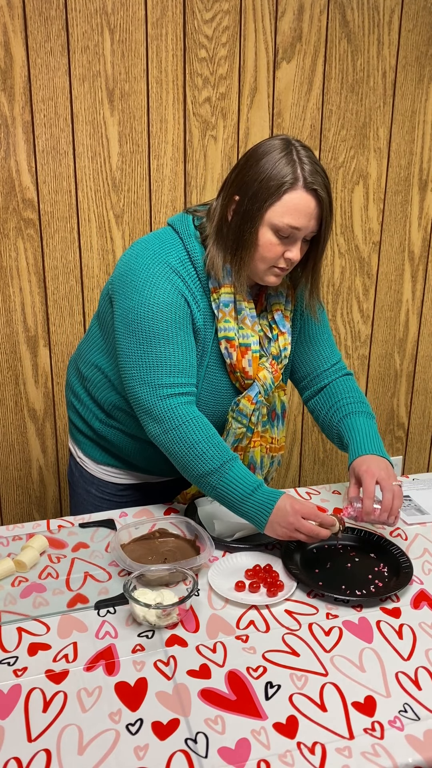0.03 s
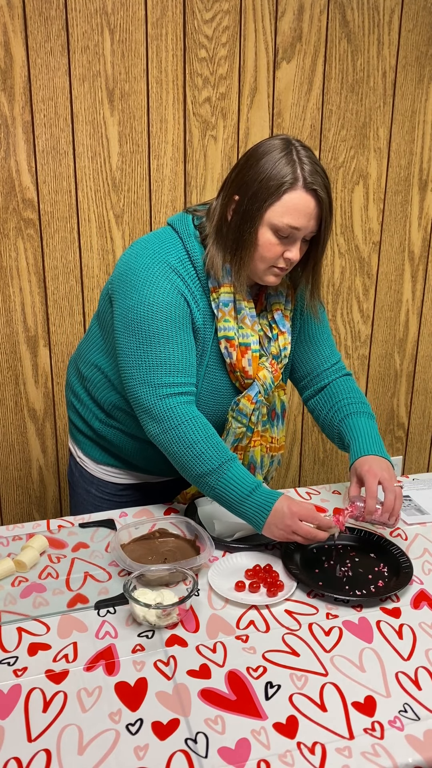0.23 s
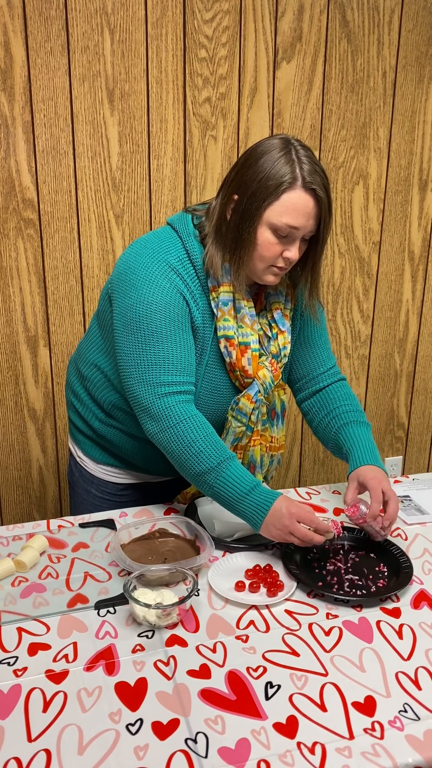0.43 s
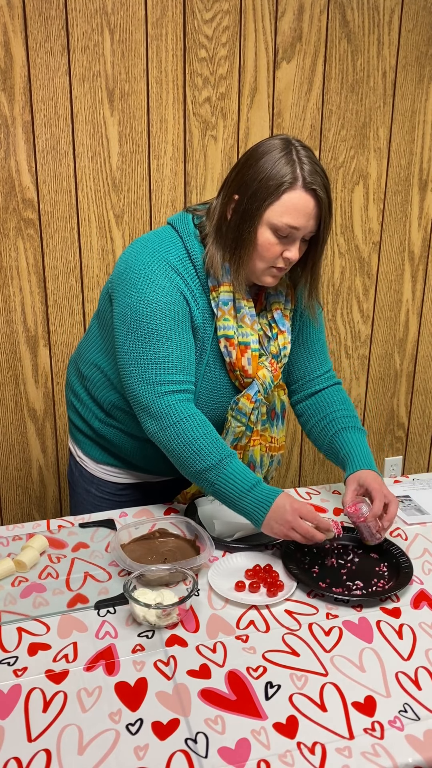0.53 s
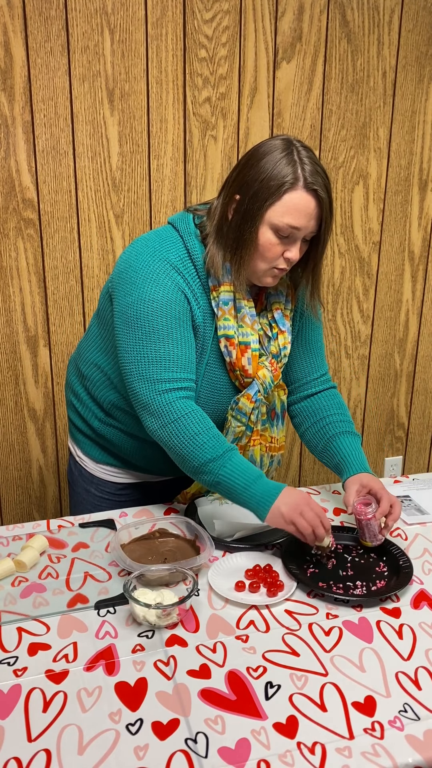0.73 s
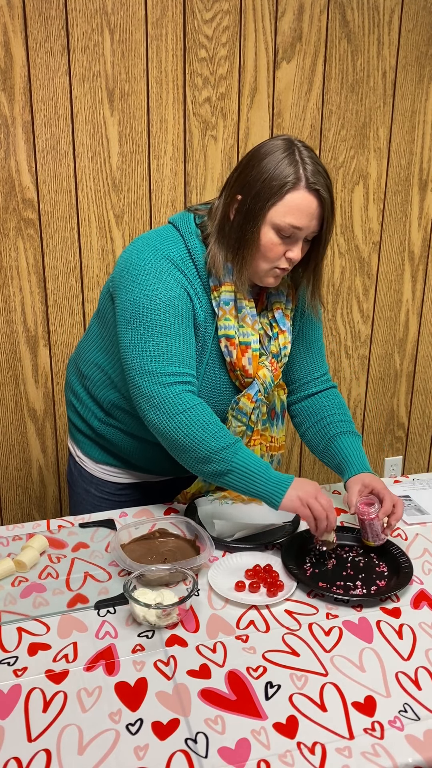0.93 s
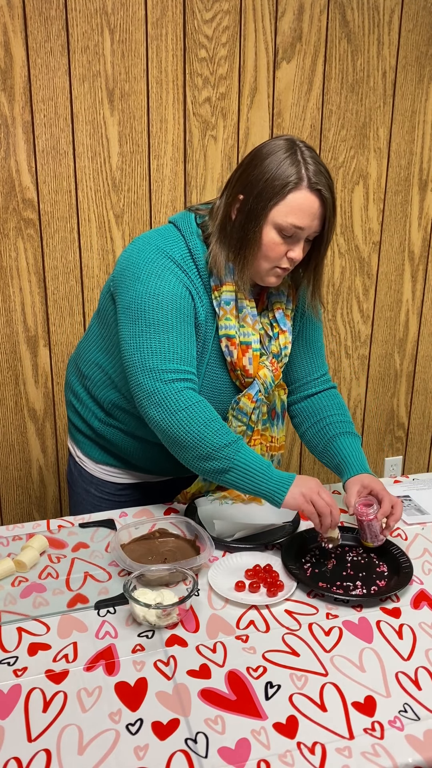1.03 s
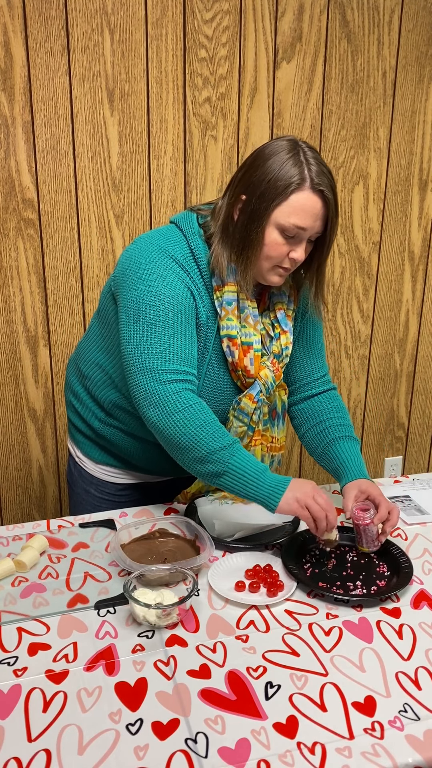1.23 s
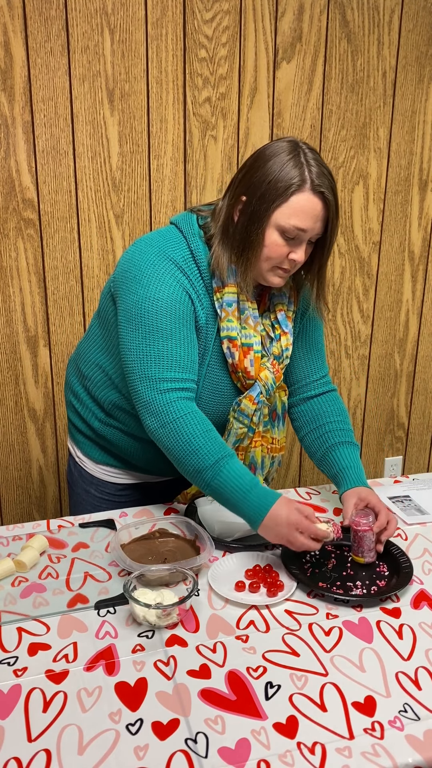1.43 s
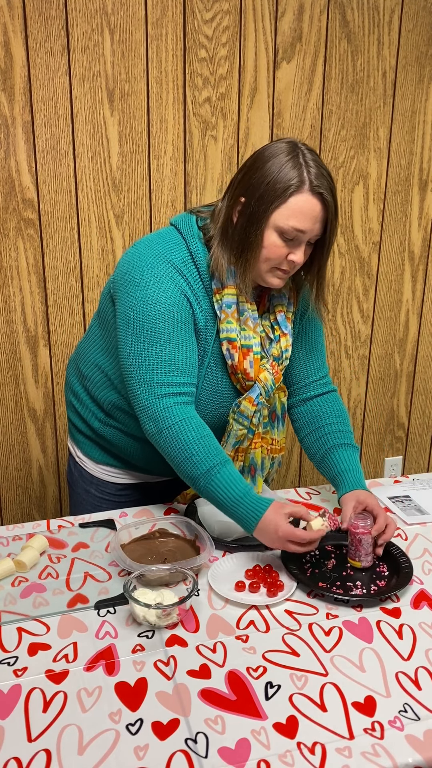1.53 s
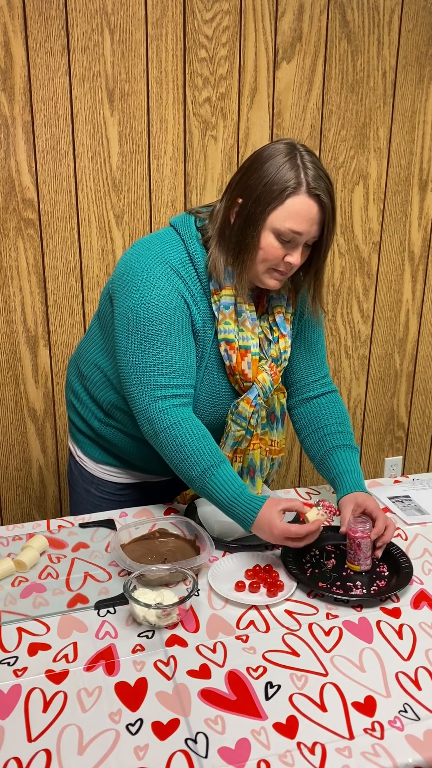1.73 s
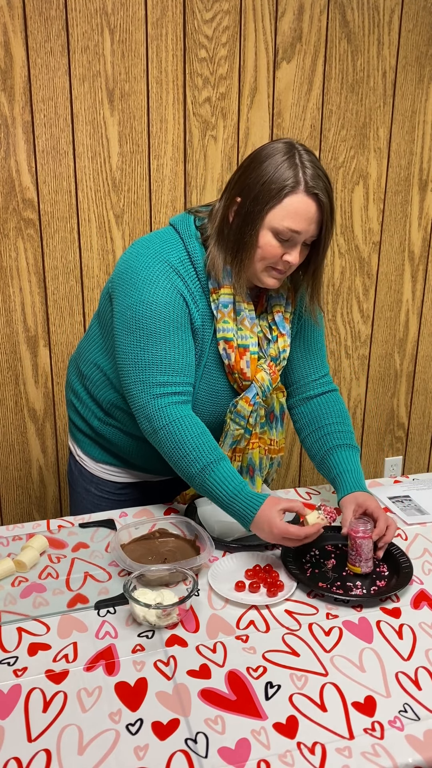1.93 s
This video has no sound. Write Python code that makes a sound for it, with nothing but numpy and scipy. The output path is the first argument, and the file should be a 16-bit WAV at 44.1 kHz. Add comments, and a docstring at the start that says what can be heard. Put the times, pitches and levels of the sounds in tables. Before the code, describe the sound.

Sugar sprinkles rattle onto a plastic plate after a small jar clicks as it tips. The rush thins to single ticks, then faint handling taps follow, straight ahead in a kitchen with a low hum and short echo.

```python
"""Sugar sprinkles are shaken from a small jar onto a plastic plate in a panelled kitchen.
A low hum and rumble lie under everything. First the jar clicks and knocks as it is tipped.
Then a rush of grains lands, each a tiny crack that makes the plate ring, and the thickest part
drums dully into the table. The rush thins to single ticks. Last come a few faint handling taps
as grains shift in the jar. The room adds a short echo to the clicks and the rattle."""
import sys
import numpy as np
from scipy import signal
from scipy.fft import rfft, irfft
from scipy.io import wavfile
from scipy.ndimage import uniform_filter1d

SR = 44100
rng = np.random.default_rng(int(sys.argv[2]) if len(sys.argv) > 2 else 0)


def int16_out(signal):
    """Quantize to a 16-bit WAV file."""
    q = np.round(np.clip(np.atleast_2d(signal).T, -1, 1) * 32767)
    wavfile.write(sys.argv[1], SR, q.astype(np.int16))


N = 88200
TIME = np.arange(N) / SR

# The tone of the room's rumble. Each row: frequency in Hz, relative level in dB.
RUMBLE_TONE = [(22, -42), (40, -13), (62, 3), (92, -8.5), (130, -8), (205, -2.5), (300, -8), (400, -11),
               (540, -19.5), (700, -27.5), (1000, -23), (2000, -40.5), (5000, -44.5), (16000, -55)]
# How loud the rumble is. Each row: time in seconds, level in dB.
RUMBLE_LEVELS = [(0, -51), (1.0, -51.5), (2.0, -49)]
# How much the rumble differs between the ears. Each row: frequency in Hz, dB against the shared part.
RUMBLE_SPREAD = [(60, -26.5), (170, -22), (350, -9), (1000, -3)]
# Jar clicks and landing clumps. Each row: start in seconds, contact fade time in seconds,
# plate ring in dB, rattle in dB, treble in dB, pitch of the struck spot in Hz.
HITS = [(0.0497, 0.0037, -44.5, -37, -49, 4600), (0.1817, 0.0013, -49.5, -37, -46, 6430),
        (0.2405, 0.0019, -35.5, -29.5, -36, 5200), (0.2997, 0.013, -35.5, -37.5, -31.5, 1540),
        (0.3042, 0.004, -60, -23.5, -30.5, 3540), (0.3135, 0.0038, -46, -28, -33, 6400),
        (0.32, 0.0055, -46.5, -46, -38, 12000), (0.348, 0.001, -38, -39, -57, 1700),
        (0.3837, 0.0071, -43, -34.5, -34.5, 10400), (0.3947, 0.0041, -29, -34.5, -45, 1340),
        (0.4367, 0.0028, -28, -28.5, -50, 1390), (0.461, 0.01, -28.5, -24, -34.5, 6900),
        (0.47, 0.0084, -26, -28, -38, 1500), (0.48, 0.0099, -30, -31, -36, 1554),
        (0.4866, 0.0037, -26, -33.5, -34.5, 1900), (0.669, 0.005, -55, -37, -35.5, 7100),
        (0.8063, 0.0015, -38.5, -32.5, -51, 900), (1.0163, 0.001, -39.5, -38.5, -45.5, 1620),
        (1.6555, 0.0027, -53.5, -49, -53.5, 1970), (1.906, 0.0039, -44, -39.5, -46, 4900)]
# Three sets of resonances (pitches that ring when struck): the plate's low ring, the rattle, the treble.
# Each row: pitch in Hz, width in Hz, relative level in dB.
PLATE_RING = [(567, 90, -19.5), (890, 88, -5), (1027, 63, -2), (1425, 290, 0.5), (1620, 225, -1),
              (1972, 87, 1.5)]
RATTLE_RING = [(2273, 187, -0.13), (2787, 212, 0.46), (3027, 383, -2), (3467, 555, -5), (5170, 800, 0.5),
               (5650, 790, 0), (6360, 430, -0.3), (6904, 164, -0.5)]
TREBLE_RING = [(7490, 2250, 0), (8500, 1900, 1.5), (9150, 345, 2), (10870, 2860, -10), (15500, 2600, -15.5)]
# The range of those three sets. Each row: low edge in Hz, high edge in Hz.
RING_RANGES = [(620, 2140), (1900, 8230), (6600, 15400)]
# Stereo width of those three sets. One number each; 0 means the same in both ears.
RING_WIDTHS = [0.19, 0.43, 0.15]
# Hard knocks of the jar. Each row: start in seconds, level in dB.
CLACKS = [(.0502, -40.5), (.3015, -28.5), (.3075, -25.5), (.4825, -22.5)]
# The jar's own ring. Each row: pitch in Hz, relative level in dB.
JAR_RING = [(1440, 4.5), (1912, 7), (3600, 2), (5500, -8), (6500, -2.5)]
# Single sharp ticks: the first is the opening click's echo off a wall, the rest are sprinkles.
# Each row: start in seconds, level in dB, pitch in Hz.
TICKS = [(0.0637, -47, 4400), (0.3966, -28.5, 2120), (0.4288, -38.5, 7860), (0.527, -33, 4750),
         (0.532, -32, 5100), (0.5396, -40, 4900), (0.5691, -33.5, 2240), (0.5899, -33, 1740),
         (.6057, -37, 5150), (0.6315, -32, 5840), (0.648, -28.5, 5400), (.6953, -36.5, 4900),
         (.704, -42, 1850), (0.7432, -32, 8400), (.755, -37.5, 6460), (.767, -43, 2670), (0.795, -34, 7660),
         (.8207, -39.5, 9050), (.8272, -44.5, 3350), (0.8888, -37, 7800), (0.8925, -33.5, 6740),
         (.9027, -42, 7400), (0.9083, -37, 7500), (0.9707, -47, 8200), (1.0057, -41, 1300),
         (1.046, -35.5, 8500), (1.0606, -38, 8000), (1.121, -35, 5780), (1.1275, -43.5, 6360),
         (1.1346, -42.5, 5600), (1.157, -39, 5060), (1.139, -45, 5400), (1.1826, -48.5, 5240),
         (1.204, -39, 9000), (1.2694, -51, 9100), (1.2895, -47, 6100), (1.3155, -53, 8500),
         (1.3194, -50.5, 8500), (1.6947, -50.5, 1600), (1.7492, -52.5, 11700), (1.833, -59.5, 9500),
         (1.8425, -62, 10100)]
# The stream of grains. Each row: time in seconds, grains per second, plate ring in dB,
# rattle in dB, treble in dB.
POUR = [(.165, 250, -84, -56, -62), (.2, 1200, -62, -60, -51.5), (.28, 2400, -63, -45, -49),
        (.34, 3000, -45, -42, -49.5), (.42, 1900, -44.5, -35.5, -38), (.47, 2900, -30, -26.5, -39),
        (.505, 2800, -28.5, -26.5, -38), (.535, 5400, -35, -23.5, -33.5), (.56, 2170, -34.5, -29.5, -41),
        (.66, 1300, -37.5, -32, -39.5), (.78, 1190, -44, -41, -41), (.88, 900, -50, -42.5, -43),
        (.96, 920, -50.5, -48.5, -56.5), (1.18, 740, -52.5, -52.5, -52.5), (1.26, 650, -67, -58.5, -54),
        (1.4, 640, -61.5, -62.5, -68.5), (1.5, 510, -64, -69.5, -75), (1.63, 890, -82, -76, -77)]
# Hollow tocks of the jar's wall. Each row: start in seconds, pitch in Hz, level in dB.
TOCKS = [(0.2426, 846, -42), (0.8075, 894, -36.5), (.837, 960, -41), (1.9065, 510, -55.5)]
# The tones in one tock. Each row: multiple of the tock's pitch, relative level in dB.
TOCK_RING = [(0.659, -21), (1, 4), (1.1, 1.5), (1.3, -0.5)]
# The tone of the table's thud. Each row: frequency in Hz, relative level in dB.
THUD_TONE = [(60, -17), (120, -24), (175, 1), (260, -6), (400, -10.5), (600, -3.5), (1000, -52),
             (3000, -76)]
# Grains shifting as the jar is turned upright. The rows read like those of POUR.
SETTLE = [(1.64, 596, -70, -62, -81), (1.67, 1190, -61.5, -60.5, -60), (1.8, 405, -73.5, -68.5, -72),
          (1.87, 298, -79, -66.5, -61.5), (2.0, 396, -65, -68, -68)]
# The tone of the room's echo. Each row: frequency in Hz, boost or cut in dB.
ECHO_TONE = [(200, 17.5), (1000, -1), (2000, -4.5), (4000, 6), (6500, -4), (9000, -4.5), (16000, -5)]

CLICK_WINDOW_S = .005   # a click's level is its average over about this time


def from_db(db):
    """Turn decibels into a number to multiply by."""
    return 10 ** (np.asarray(db) / 20)


def rms_one(x):
    """Scale a sound so that its average power is 1."""
    return x / np.sqrt(np.mean(x ** 2) + 1e-20)


def energy_one(x):
    """Scale a sound so that its total energy is 1 per channel."""
    return rms_one(x) / np.sqrt(x.shape[-1])


def stereo_noise(size, width):
    """Make hiss that is partly alike in both ears."""
    mid, side = rng.standard_normal((2, size))
    return rms_one(mid + width * side * np.array([[1], [-1]]))


def shape_tone(x, tone):
    """Boost or cut frequencies by a table of Hz and dB."""
    hz, db = np.transpose(tone)
    freqs = np.maximum(np.fft.rfftfreq(x.shape[-1], 1 / SR), 1)
    return irfft(rfft(x) * from_db(np.interp(np.log(freqs), np.log(hz), db)), x.shape[-1])


def resonances(modes, range_hz, size=2048):
    """How a set of resonances rings after one click: the wider ones die sooner."""
    click, out = signal.unit_impulse(size), 0
    for k, (hz, width, db) in enumerate(modes):
        decay = np.exp(-np.pi * width / SR)
        feedback = [1, -2 * decay * np.cos(2 * np.pi * hz / SR), decay ** 2]
        ring = signal.lfilter([1, 0, -1], feedback, click)
        out = out + (-1) ** k * from_db(db) * (1 - decay ** 2) * ring
    band = signal.butter(2, range_hz, "band", fs=SR, output="sos")
    return energy_one(signal.sosfilt(band, out))[None]


def struck(start_s, modes, ring_s):
    """Pure tones start together and fade by 60 dB in ring_s seconds."""
    t = np.maximum(TIME - start_s, 0)
    tones = sum(from_db(db) * np.sin(2 * np.pi * hz * t) for hz, db in modes)
    return tones * np.exp(-np.log(1000) * np.minimum(t / ring_s, 10))


def room_hum(hum_hz=64, hum_db=-65):
    """The room rumbles softly, with a faint mains hum."""
    mid, side = shape_tone(rng.standard_normal((2, N)), RUMBLE_TONE)
    rumble = rms_one(mid + shape_tone(side, RUMBLE_SPREAD) * np.array([[1], [-1]]))
    level = from_db(np.interp(TIME, *np.transpose(RUMBLE_LEVELS)))
    return rumble * level + from_db(hum_db) * np.sin(2 * np.pi * hum_hz * TIME)


def jar_and_clump_hits(gain_db=.75, spot_db=4.5, spot_width=.061, size=1500):
    """Each hit is a brief, dying crackle of contacts that sets the resonances ringing."""
    sets = zip((PLATE_RING, RATTLE_RING, TREBLE_RING), RING_RANGES)
    rings = [resonances(modes, range_hz) for modes, range_hz in sets]
    out, t = np.zeros((2, N + SR)), np.arange(size) / SR
    freqs = np.fft.rfftfreq(size, 1 / SR)
    for start_s, contact_s, *levels, spot_hz in HITS:
        spot_boost = 1 + (from_db(spot_db) - 1) / (1 + 1j * (freqs / spot_hz - 1) / spot_width)
        fade = np.exp(-t / contact_s)
        length_gain = np.sqrt((CLICK_WINDOW_S + contact_s / 2) * SR)
        start = int(start_s * SR)
        for ring, width, db in zip(rings, RING_WIDTHS, levels):
            spectrum = rfft(stereo_noise(size, width) * fade)
            flat = spectrum / (np.abs(spectrum) + 1e-9)   # every frequency equally strong
            contact = irfft(flat, size) * np.sqrt(fade)
            contact = irfft(rfft(contact) * spot_boost, size)
            hit = energy_one(signal.fftconvolve(contact, ring, axes=1))
            out[:, start:start + hit.shape[1]] += hit * from_db(db + gain_db) * length_gain
    return out[:, :N]


def jar_clacks(low_cut_hz=1150):
    """The hardest knocks make the jar ring briefly at its own pitches."""
    out = sum(from_db(db) * struck(start_s, JAR_RING, ring_s=.03) for start_s, db in CLACKS)
    return signal.sosfilt(signal.butter(2, low_cut_hz, "high", fs=SR, output="sos"), out)


def sharp_ticks(contact_s=.0011, rise_s=.0003, crack_db=-3, crack_hz=(1100, 10250), size=512):
    """The opening click's wall echo, then bouncing sprinkles: each a brief crack and a tiny ring."""
    out, t = np.zeros((2, N + SR)), np.arange(size) / SR
    band = signal.butter(2, crack_hz, "band", fs=SR, output="sos")
    rise = 1 - np.exp(-t / rise_s)
    for start_s, db, hz in TICKS:
        contact = stereo_noise(size, RING_WIDTHS[1]) * np.exp(-t / contact_s)
        crack = energy_one(signal.sosfilt(band, signal.sosfilt(band, contact)))
        fade = np.exp(-np.pi * hz * t / 7.9)   # nearly gone after eight vibrations
        ring = energy_one(rise * np.sin(2 * np.pi * hz * t) * fade)
        tick = energy_one(ring + from_db(crack_db) * crack)
        start = int(start_s * SR)
        out[:, start:start + size] += tick * from_db(db) * np.sqrt(CLICK_WINDOW_S * SR)
    return out[:, :N]


def grain_stream(flow, spots=4, gain_db=-1.5, grain_s=.0005, bunch_db=3, bunch_s=.006, even_s=.043):
    """Grains land in random bunches, each a tiny crack. Gives one sound for each landing spot."""
    times, per_second, *levels = np.transpose(flow)
    bunching = from_db(bunch_db * rms_one(uniform_filter1d(rng.standard_normal(N), int(bunch_s * SR))))
    landed = rng.random(N) < bunching * np.interp(TIME, times, per_second, left=0, right=0) / SR
    latest_landing = np.maximum.accumulate(landed * np.arange(N))
    spot = rng.integers(0, spots, N)[latest_landing]
    size_db = 2.5 * rng.standard_normal(N)   # bigger grains are louder
    out = np.zeros((spots, 2, N))
    sets = zip((PLATE_RING, RATTLE_RING, TREBLE_RING), RING_RANGES, RING_WIDTHS, levels)
    for modes, range_hz, stereo_width, db in sets:
        tone_db = 2 * rng.standard_normal(N)   # some grains are brighter, some duller
        power = landed * from_db(size_db + tone_db) ** 2
        power = signal.lfilter([1], [1, -np.exp(-2 / (grain_s * SR))], power + 1e-12)   # cracks fade
        power /= np.abs(uniform_filter1d(power, int(even_s * SR))) + 1e-3   # even out the stream
        level = from_db(np.interp(TIME, times, db) + gain_db)
        cracks = stereo_noise(N, stereo_width) * np.sqrt(power) * level
        for k in range(spots):   # each spot rings at slightly different pitches
            shifted = [(hz + .56 * width * rng.uniform(-1.2, 1), width, mode_db)
                       for hz, width, mode_db in modes]
            ring = resonances(shifted, range_hz)
            out[k] += signal.oaconvolve(cracks * (spot == k), ring, axes=1)[:, :N]
    return out


def jar_tocks(low_cut_hz=590):
    """Firmer knocks wake a few dull tones in the jar's wall; the jar is too small to give out bass."""
    out = np.zeros(N)
    for start_s, hz, db in TOCKS:
        modes = [(hz * multiple, mode_db) for multiple, mode_db in TOCK_RING]
        out += from_db(db) * struck(start_s, modes, ring_s=.032)
    return signal.sosfilt(signal.butter(2, low_cut_hz, "high", fs=SR, output="sos"), out)


def table_thud(start_s=.459, level_db=-41.5, rise_s=.035, fade_s=.13):
    """The first rush of grains drums dully through the plate into the table."""
    t = np.maximum(TIME - start_s, 0)
    swell = np.minimum(t / rise_s, 1) * np.exp(-np.maximum(t - rise_s, 0) / fade_s)
    drumming = rms_one(shape_tone(stereo_noise(N, width=.12), THUD_TONE))
    return from_db(level_db) * swell * drumming


def kitchen_echo(x, early_s=.025, early_db=-6.5, tail_s=.22, tail_db=-3.5, wall_s=.016, wall_db=-19):
    """Sound comes back quickly off the table, once off a wall, and as a short blurred tail."""
    t = TIME[:N // 3]
    early = energy_one(stereo_noise(len(t), width=.14) * np.exp(-np.log(1000) * t / early_s))
    tail = energy_one(stereo_noise(len(t), width=.53) * np.exp(-np.log(1000) * t / tail_s))
    echo = from_db(early_db) * early + from_db(tail_db) * tail
    echo[:, int(wall_s * SR)] += from_db(wall_db)
    echo = np.pad(echo, ((0, 0), (SR // 1000, 0)))   # all of it comes a millisecond later
    return signal.fftconvolve(x, shape_tone(echo, ECHO_TONE), axes=1)[:, :N]


def scene(right_delay_s=.000012, pan_db=.3):
    """Jar and plate stand almost straight ahead; every landing spot has its own echo."""
    knocks = jar_and_clump_hits() + jar_clacks() + jar_tocks()
    spots = grain_stream(POUR) + grain_stream(SETTLE)
    ticks = sharp_ticks()
    in_room = sum(x + kitchen_echo(x) for x in [knocks, *spots])
    left, right = in_room + ticks + from_db(1.5) * kitchen_echo(ticks)
    # The right ear hears it a hair later and a touch louder.
    delay = np.exp(-2j * np.pi * np.fft.rfftfreq(N, 1 / SR) * right_delay_s)
    right = irfft(rfft(right) * delay, N)
    both_ears = np.array([left * from_db(-pan_db), right * from_db(pan_db)])
    return both_ears + table_thud() + room_hum()


def record(dry, cutoff_hz=16100):
    """The very highest treble is cut off steeply."""
    return signal.sosfilt(signal.ellip(10, .2, 80, cutoff_hz, fs=SR, output="sos"), dry)


dry = scene()
out = record(dry)
int16_out(out)
```